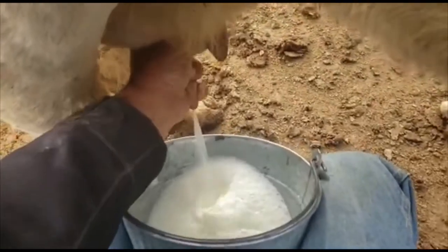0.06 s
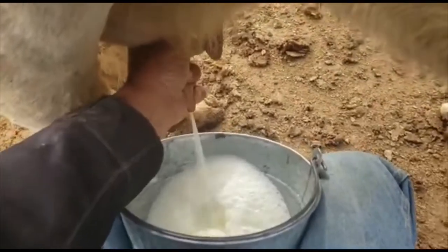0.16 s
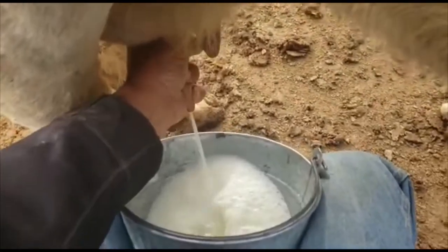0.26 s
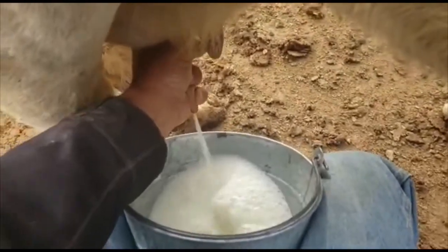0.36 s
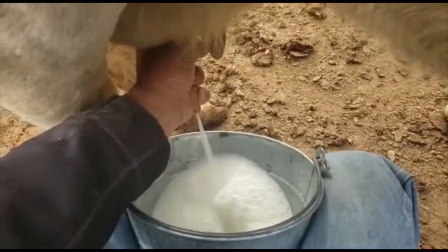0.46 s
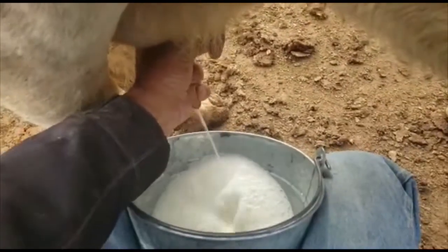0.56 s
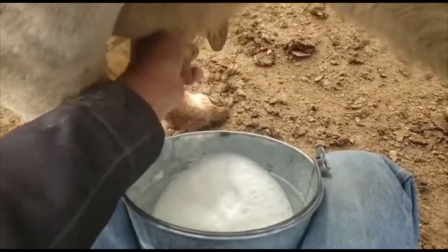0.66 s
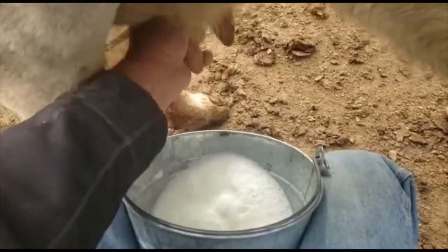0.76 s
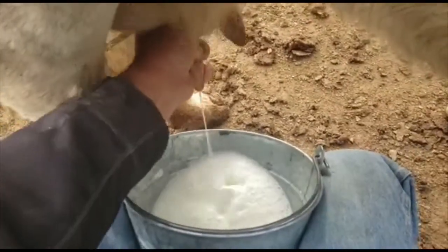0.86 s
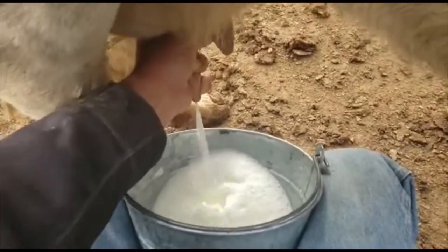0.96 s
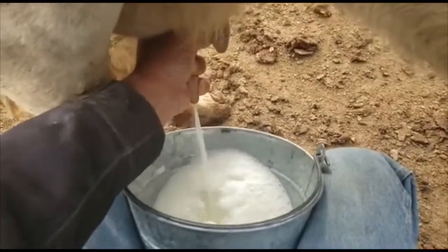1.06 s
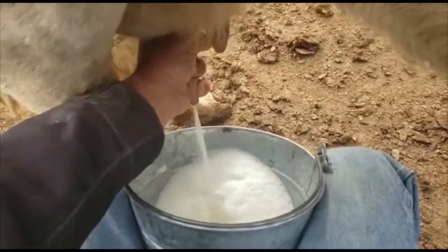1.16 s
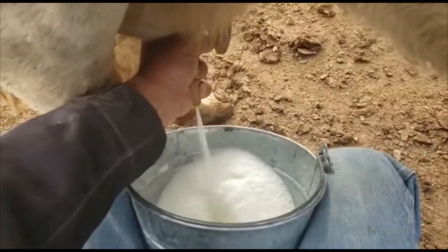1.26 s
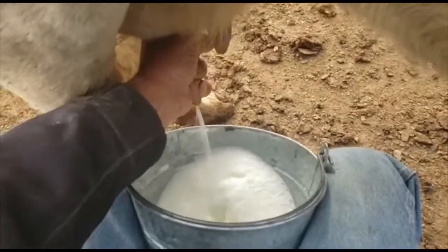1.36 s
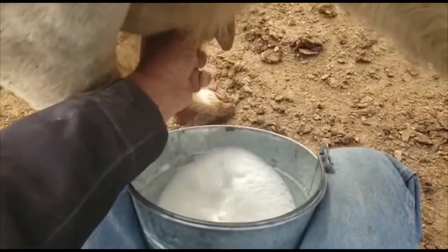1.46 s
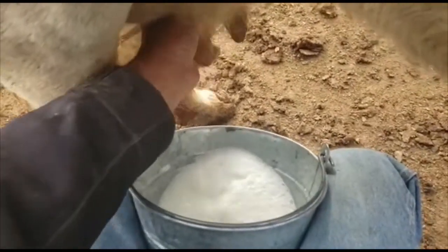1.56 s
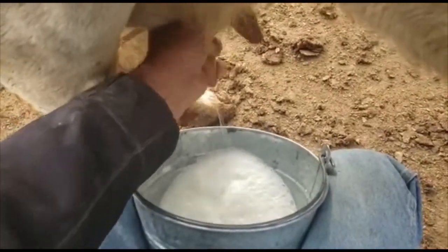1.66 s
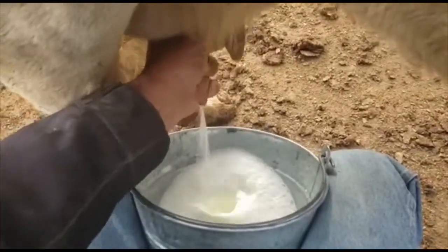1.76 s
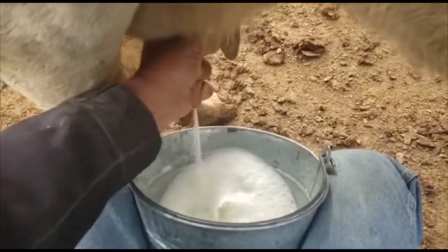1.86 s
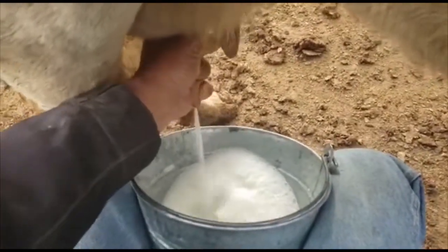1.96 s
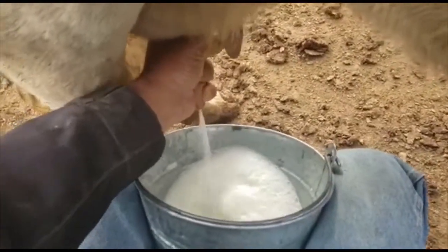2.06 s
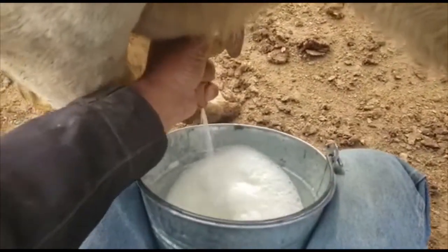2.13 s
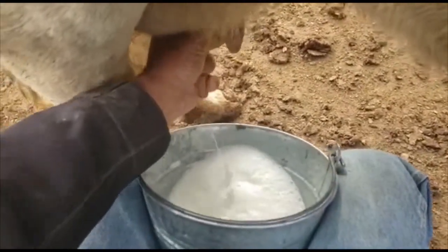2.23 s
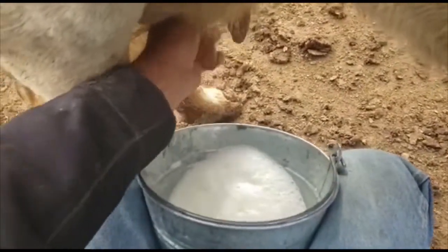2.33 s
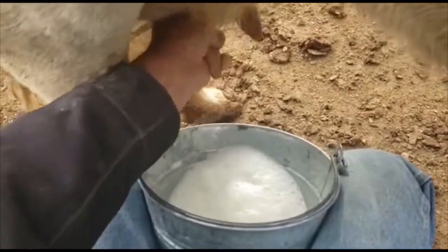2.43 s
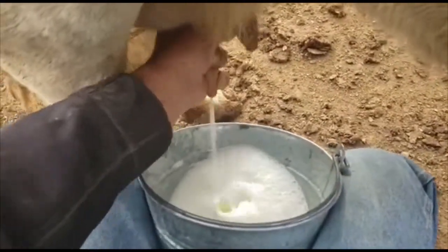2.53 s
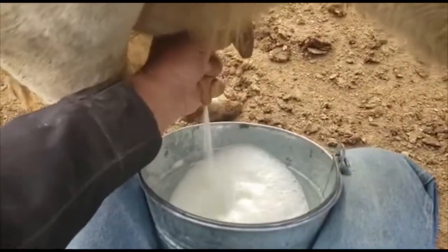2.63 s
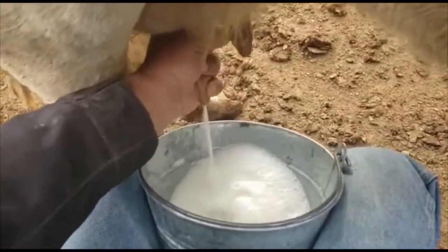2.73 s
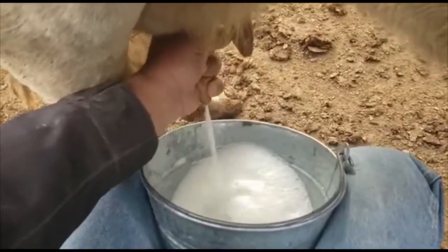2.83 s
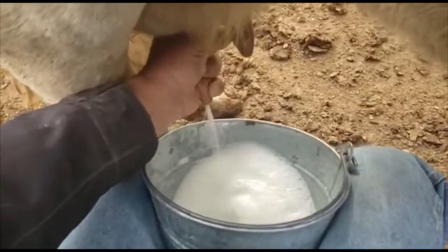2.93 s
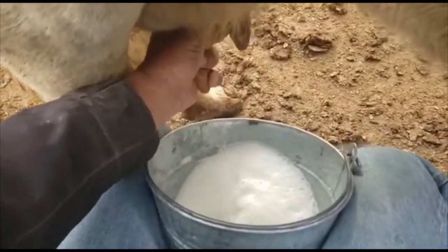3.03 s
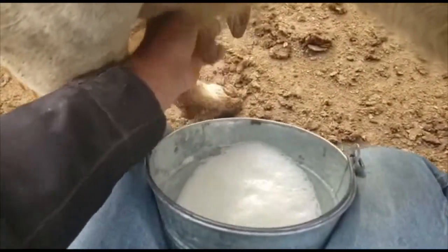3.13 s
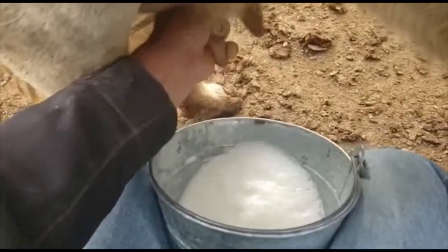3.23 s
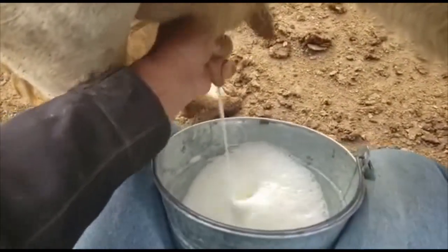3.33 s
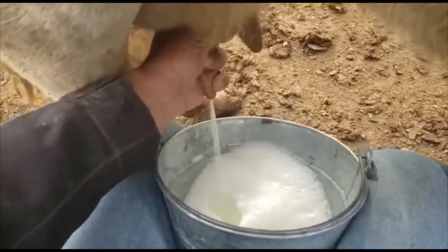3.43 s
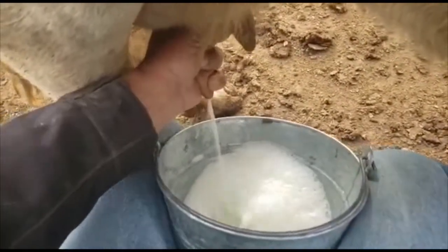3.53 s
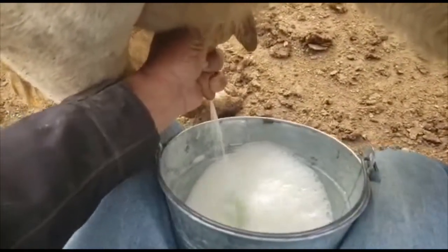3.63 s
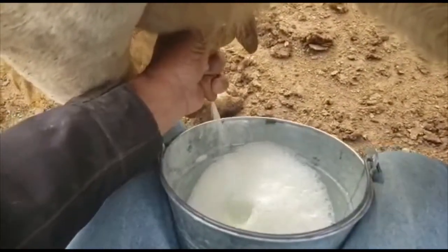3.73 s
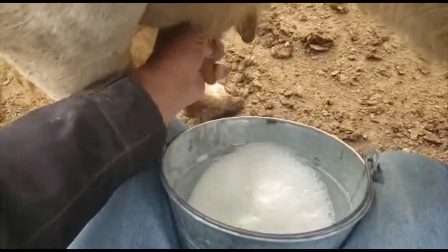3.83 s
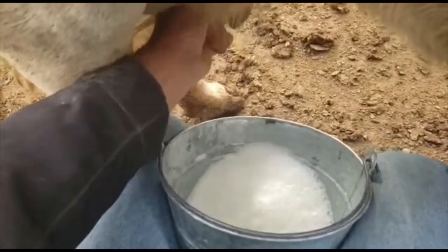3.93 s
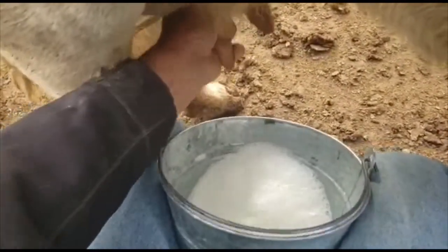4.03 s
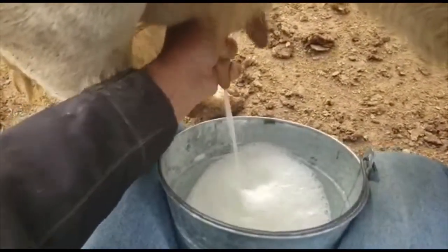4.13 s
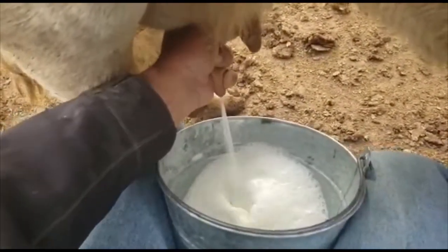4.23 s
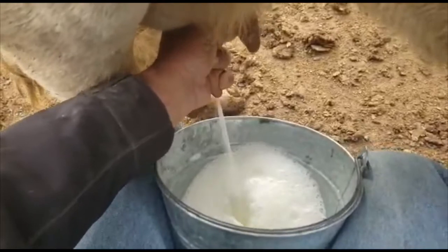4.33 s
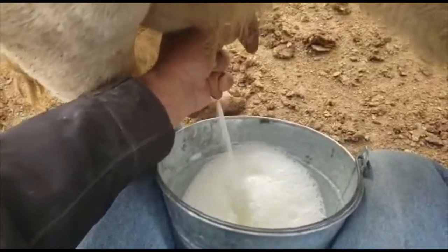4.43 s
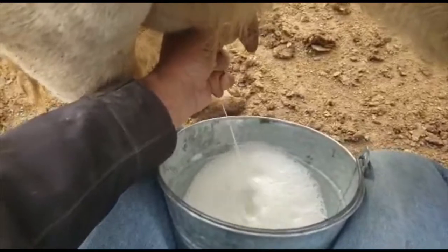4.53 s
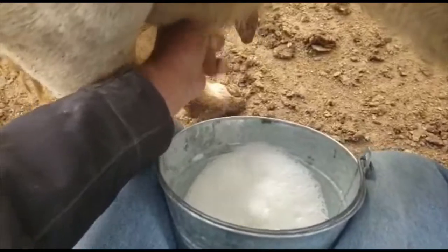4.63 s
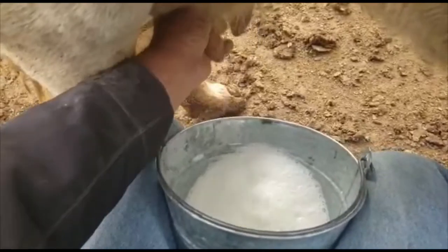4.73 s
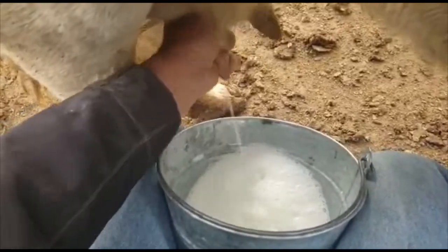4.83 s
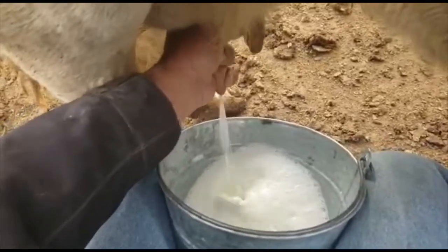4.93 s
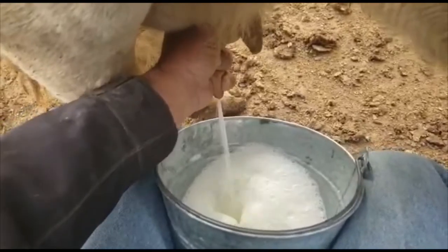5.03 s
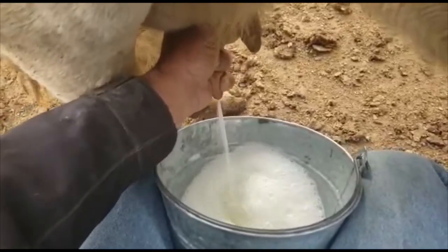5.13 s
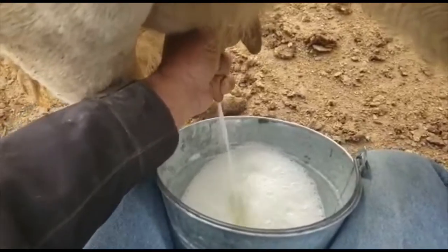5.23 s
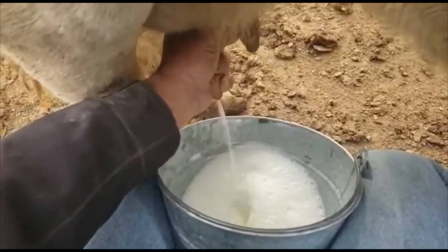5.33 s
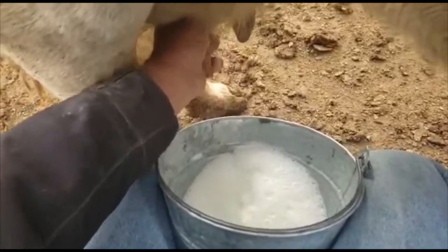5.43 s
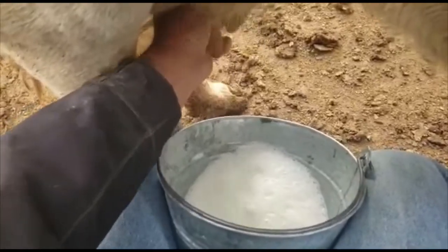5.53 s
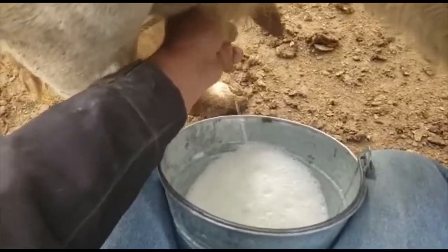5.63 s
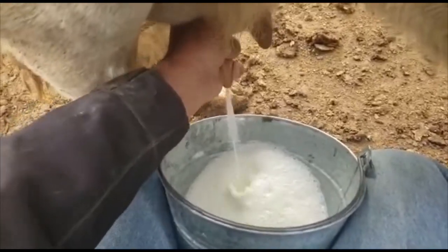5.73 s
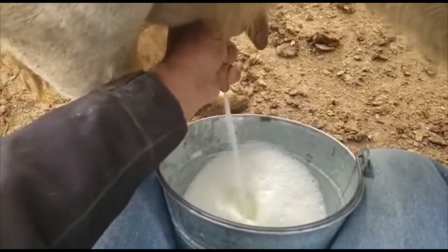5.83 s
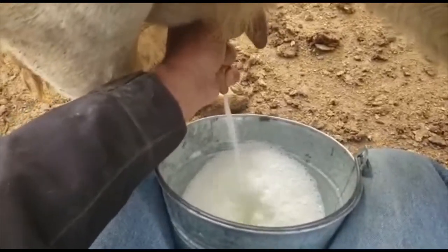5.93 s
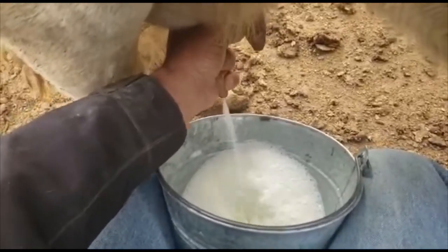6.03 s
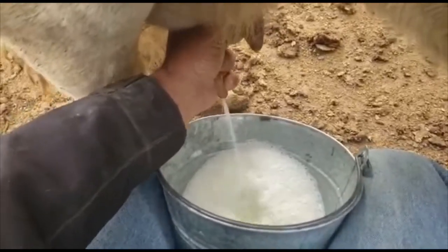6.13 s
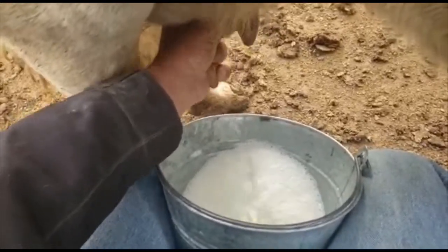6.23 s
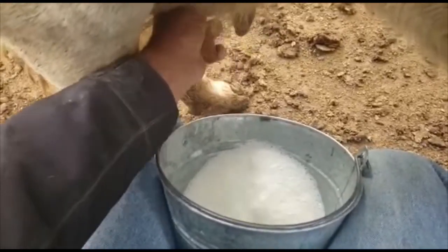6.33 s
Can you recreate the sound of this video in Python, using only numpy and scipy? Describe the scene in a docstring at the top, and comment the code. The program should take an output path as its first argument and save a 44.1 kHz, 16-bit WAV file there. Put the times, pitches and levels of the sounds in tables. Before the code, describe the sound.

Close by, hand-squeezed jets of milk spurt into a foamy metal pail, about one every 0.8 seconds. Each starts suddenly with a hiss, digs into the foam with plops and a low gurgle, then breaks into drops and stops. Sharp little spits and soft fizz fill the gaps. Far off outdoors a vehicle revs up, changes gear and drives on; a cow lows once, very faintly. Close stereo microphones, dry open air.

```python
"""Hand milking into a foaming pail

Jets of milk, squeezed out by hand, spurt into the foam in a metal pail close to a pair of microphones.
Spray, spits and splash are coloured noise puffs; the gurgle of the hole in the foam is decaying sine bubbles.
The foam fizzes as dense tiny puffs, plainest in the pauses. Far off a vehicle speeds up and changes gear
(multiples of its firing rate over rumble), and a cow lows once (harmonics in step). Low noise is moving air."""
import sys
import numpy as np
from scipy import signal
from scipy.fft import rfft, irfft, next_fast_len
from scipy.io import wavfile
from scipy.ndimage import uniform_filter1d

SR = 44100
rng = np.random.default_rng(int(sys.argv[2]) if len(sys.argv) > 2 else 0)


def wrap_up_sound(samples):
    """Save the sound to the file named by the first command line argument, as 16-bit audio."""
    columns = np.atleast_2d(samples).T
    # keep every value between -1 and 1, then stretch to whole-number steps
    tamed = np.clip(columns, -1, 1)
    steps = np.round(tamed * 32767).astype(np.int16)
    wavfile.write(sys.argv[1], SR, steps)


def field_ratio(decibels):
    """Amplitude ratio for a level in dB (20 dB per decade); scalars and array-likes work."""
    return 10 ** (np.asarray(decibels, dtype=float) / 20)


N = 281342

# Squirts. Each row: jet start, full flow, grip easing, knee and stop in seconds, spray level in dB at full flow
# before the surge. Squirts 2, 5, 6 and 8 break off abruptly; the others fade.
SQUIRTS = [(-.05, .0, 0.42, .586, 0.61, -34.5), (0.825, 0.875, 1.33, 1.436, 1.41, -34.5),
           (1.663, 1.708, 2.06, 2.2, 2.238, -34.5), (2.463, 2.518, 2.833, 2.974, 3.085, -36),
           (3.273, 3.329, 3.58, 3.79, 3.792, -35.5), (4.078, 4.123, 4.47, 4.54, 4.53, -37),
           (4.803, 4.856, 5.22, 5.36, 5.385, -36), (5.623, 5.685, 6.02, 6.24, 6.197, -36.5)]
# Spits of milk, ticks and bursts, before colouring. Each row: time in seconds, hiss peak in dB,
# centre in Hz, length in seconds, thud in dB re the hiss.
SPITS = [(.021, -20.5, 3800, 0.019, 5), (.2569, -28, 5540, .003, -25), (.282, -18, 5800, 0.0047, -22),
         (0.876, -14, 3720, 0.0021, 3), (0.906, -11.5, 3760, 0.0024, -15), (1.4263, -36, 7000, 0.0036, -20),
         (1.7377, -14.5, 3400, 0.0029, -12), (1.744, -14.5, 3400, 0.0038, -19),
         (1.7475, -24, 6473, 0.0037, -16), (2.699, -26, 6110, 0.0023, -26),
         (2.9006, -26, 5600, 0.0025, -12), (3.003, -47, 6000, .002, -20), (3.034, -44, 5056, .006, 4),
         (3.338, -31, 3000, .0035, 9), (3.7714, -38, 5460, 0.0038, -20), (3.82, -28, 5240, 0.021, -5),
         (4.0377, -3, 5583, 0.0071, -25), (4.043, -12, 5607, 0.023, -22), (4.1143, -12.5, 6080, .005, -12),
         (4.121, -21.5, 5000, 0.014, -18), (4.233, -16, 5750, .0015, -24), (4.658, -28, 5520, 0.013, -5),
         (4.833, -29, 5540, .0045, 1), (4.859, -14, 5817, 0.0053, -20), (5.462, -24, 5800, 0.022, -8),
         (5.5787, -30.5, 5796, 0.011, -4), (5.648, -27, 5530, .0035, -18), (5.698, -16.5, 5286, 0.0094, -9),
         (6.082, -22.5, 5900, .0043, -31), (6.2997, -40.5, 5406, 0.0096, -9)]
# Spit opening each squirt but the first: hiss peak in dB, centre in Hz, length in seconds
# (below the 1 ms floor, so 1 ms), thud in dB re the hiss.
OPENING_SPIT = (-30, 5500, -0.1, -23)
# Single loud bubbles: low gulps, and higher plops at the mouth of the hole.
# Each row: time in seconds, level in dB before colouring, pitch in Hz.
LOUD_BUBBLES = [(.019, -19.5, 980), (.029, -15.5, 299), (0.151, -27, 330), (0.217, -21, 305),
                (.309, -21, 320), (.844, -28.5, 421), (0.873, -19.5, 1180), (.875, -24.5, 275.2),
                (.952, -24, 326), (1.107, -19, 273), (1.73, -24, 1001), (1.737, -21, 1110),
                (1.747, -20.5, 410), (1.836, -26, 339), (2.018, -20.5, 323), (2.123, -22.5, 335),
                (2.504, -26.5, 469.7), (2.523, -25.5, 985), (3.294, -27, 428), (3.336, -23, 1170),
                (3.337, -19.5, 415), (3.561, -25, 368), (3.593, -22, 326), (3.82, -32.5, 260),
                (4.04, -20.5, 293.2), (4.082, -19, 1160), (4.1, -30, 1170), (4.172, -30, 1170),
                (4.196, -27, 1160), (4.3, -23.5, 357), (4.847, -23.5, 1200), (4.883, -30, 958),
                (4.885, -21, 450), (4.965, -30, 301), (5.064, -27, 410.6), (5.2, -25, 300),
                (5.465, -34, 291.7), (5.664, -27.5, 450), (5.68, -24, 1249), (5.829, -20, 328),
                (5.972, -22.5, 297)]
# Spray colour. Each row: frequency in Hz, relative density in dB per Hz.
SPRAY_COLOUR = [(1400, -20.5), (2000, -14.5), (2450, -8.5), (3200, -2.5), (3700, -4.5), (4400, -3.5),
                (5300, 1.5), (6300, -2), (7500, -1), (8200, -6.5), (9000, -10.5), (10500, -5.5),
                (12100, -3), (14000, 0), (15600, -3)]
# Splash colour at the mouth of the hole. Each row: frequency in Hz, relative density in dB per Hz.
HOLE_MOUTH_COLOUR = [(410, -47), (700, -3), (974, 4.5), (1060, 2.5), (1190, 2), (1350, -8.5), (1640, 3.5),
                     (2020, -6), (2400, -13.5), (3120, -31), (5280, -120)]
# Pail resonances. Each row: frequency in Hz, width in Hz, lift in dB.
PAIL_RINGS = [(3400, 110, 3), (4013, 210, 5.5), (4760, 62, 7.5), (5160, 64, -7.5), (5657, 170, 5),
              (6450, 45, 4.5), (7350, 51, 9), (12000, 47, 9.5)]
# Fizz colour. Each row: frequency in Hz, relative density in dB per Hz.
FIZZ_COLOUR = [(240, -29.5), (400, -3), (439, -13), (697, -20.5), (1600, -26), (1900, -23), (2290, -29),
               (2800, -23), (3310, -26), (4310, -20.5), (6950, -18.5), (8630, -27), (16000, -23.5)]
# Fizz level before stirring and wander. Each row: time in seconds, level in dB.
FIZZ_LEVEL = [(.7, -63.5), (1.45, -56), (1.65, -60.5), (2.35, -61), (3.05, -55), (3.26, -64.5), (3.8, -53),
              (4, -55), (4.6, -66), (4.8, -71), (5.42, -61.5), (5.6, -73), (6.25, -65), (6.36, -61)]
# Engine. Each row: time in seconds, firing rate in Hz, levels in dB of its multiples 2, 3 and 4 before blur.
ENGINE = [(0, 33.15, -38, -40, -32), (.17, 35.46, -43, -39, -43.5), (.3, 37.15, -39, -35, -36),
          (.45, 38.74, -41, -52, -42), (.6, 41.2, -36.5, -36, -37), (.76, 43, -45, -40, -47),
          (1.05, 47, -35.5, -33.5, -45.5), (1.3, 52, -43, -38.5, -59), (1.55, 54.6, -41, -35, -56),
          (1.95, 60.4, -41, -46.5, -68), (2.06, 62.03, -54, -39.5, -77), (2.3, 65.8, -35, -50, -52),
          (2.52, 67.96, -50.5, -47, -57), (2.7, 71.2, -35, -38.5, -60), (3.02, 74.3, -40.5, -42.5, -73),
          (3.12, 69.6, -49, -46, -64), (3.36, 58.2, -53, -51, -62), (3.47, 52.46, -55, -45, -62),
          (3.6, 51.43, -54, -46, -56), (3.72, 49.7, -57, -39, -65), (3.83, 43.9, -52, -42.5, -60),
          (3.89, 36.3, -50, -48, -40), (4.01, 36.9, -52, -46, -37), (4.12, 42.23, -44.5, -49.5, -52),
          (4.45, 41.24, -46.5, -46, -51.5), (5, 43.46, -47.5, -48.5, -54), (5.6, 45.9, -46, -45.5, -61),
          (6.38, 50.3, -51, -43, -70)]
# Share of each tone broken up by the air on the way. Each row: time in seconds, share from 0 to 1.
AIR_BLUR = [(0, .12), (3.05, .15), (3.3, .75), (6.38, .75)]
# Road rumble colour. Each row: frequency in Hz, relative density in dB per Hz.
RUMBLE_COLOUR = [(25, -35), (45, -12), (90, -4), (150, 3.5), (220, -5), (300, -14.5), (420, -34),
                 (600, -44.5)]
# Road rumble level before wander. Each row: time in seconds, level in dB.
RUMBLE_LEVEL = [(0, -38.5), (1, -42), (2, -42), (3, -47), (4, -46), (5, -51), (6.38, -47.5)]
# Cow. Each row: time in seconds, pitch in Hz, level in dB before the muzzle.
MOO = [(1.24, 77.3, -70), (1.32, 80.2, -61), (1.45, 83.2, -58.5), (1.55, 86.13, -57), (1.8, 86.2, -59),
       (1.92, 84.7, -61), (2.02, 84.1, -68)]
# Half-shut muzzle. Each row: frequency in Hz, gain in dB.
MUZZLE = [(340, 1), (430, -4), (520, 0.5), (690, 0), (800, -1), (900, -14.5), (1100, -8.5), (1300, -33)]
# Phase between ports. Each row: frequency in Hz, lead of the left port in radians.
LEFT_LEAD = [(0, 0), (1120, 0.43), (1720, 1.37), (3270, 1.16), (4310, 1.68), (4650, -1.8), (5080, 0),
             (5770, 4.5), (7320, 7), (9040, 10), (10200, 10.5), (12100, 4.5), (14200, 9), (16400, 49)]
# Balance between ports. Each row: frequency in Hz, left minus right in dB.
LEFT_LEAN = [(60, 9), (110, 1), (200, 2.5), (380, 2.5), (700, 3.5), (1290, -3), (2380, 4), (4400, -8.5),
             (8120, -2.5), (15000, 0.5)]
# Likeness of the ports. Each row: frequency in Hz, shared part from 0 to 1.
PORT_LIKENESS = [(60, .93), (180, .99), (400, .99), (700, .94), (1400, .84), (2800, .64), (6000, .64),
                 (10000, .4), (15000, .3)]
# Loud bubble colour. Each row: frequency in Hz, relative gain in dB.
LOUD_BUBBLE_COLOUR = [(100, -30), (200, -2), (20000, -0.5)]
# Centres in Hz of the four bands coloured by where the jet lands.
AIM_HZ = [2320, 3380, 7600, 11400]
# Where the jet lands. Each row: time in seconds, lifts in dB of the four AIM_HZ bands, left minus right in dB.
AIM = [(.3, 11, 2, 2.5, 2, 0.43), (1.1, 1, 2.5, -3, -3, 0.88), (1.9, 5.5, -1, -1, -.5, 0.47),
       (2.7, 10, 0, 1.6, 2.5, 1), (3.5, 10.5, 2, 2.5, 2, 0.074), (4.3, 7, 2, -2, -1, -1.1),
       (5.1, 9.5, -0.5, 3, 0.5, -1.38), (5.9, 6, 2, 4.5, 3.5, -2.2)]
# Bubble crowd colour, from the hole. Each row: frequency in Hz, relative gain in dB.
HOLE_COLOUR = [(120, -23.5), (230, -6), (320, -0.5), (450, -3), (600, -5.5), (800, -3.5), (20000, -13.5)]
# Spit colour. Each row: frequency in Hz, relative gain in dB.
SPATTER_COLOUR = [(150, -29.5), (300, 10), (2000, -6.5), (2500, -4.5), (3200, -1), (7600, 3), (9000, -9),
                  (12000, 3.5), (16500, 4.5)]
# Moving air, before wander and port offsets. Each row: time in seconds, level in dB.
GUST = [(0, -56), (.3, -42), (.37, -30), (.44, -55), (2, -65), (6.38, -86)]
# Layer gains over a squirt: dB re the spray gain in the first drops, at full flow, late in the hold,
# in the release; then settling time after full flow in seconds. Later layer gains come on top.
GURGLE_LAYER = (-2.5, -1, -4, 2, 0.35)
SPLASH_LAYER = (-17.5, -8.5, -17, -13, 0.08)
# Fat separate drops, stronger re the spray in the first drops and the release than at full flow;
# negative time: full-flow offset grows.
BREAKUP_LAYER = (-7.5, -14.5, -13, -7.5, -3)
# Digging depth of the jet. Each row: time in seconds, gurgle lift in dB, splash lift in dB.
DEPTH = [(.1, 3, 2), (.45, -0.5, 1), (1.1, 1, 0), (1.9, -1, 0), (2.7, 0, 1), (3.5, 1, 2), (4.15, 0.5, 2.5),
         (4.4, 0.5, -0.5), (5.1, 0, 0.5), (5.9, -1.5, -0.5)]


def evened(x):
    """Scales to rms 1."""
    return x / np.sqrt(np.mean(x ** 2) + 1e-20)


def read(points, hz):
    """Reads a spectrum on a log-frequency axis."""
    f, value = np.transpose(points)
    return np.interp(np.log(hz + 1), np.log(f + 1), value)


def curve(rows, column=1):
    """One column of a table at every sample."""
    rows = np.array(rows)
    return np.interp(np.arange(N) / SR, rows[:, 0], rows[:, column])


def wander(hz):
    """Low-passed noise of rms 1: slow chance."""
    return evened(signal.lfilter([1], [1, -np.exp(-2 * np.pi * hz / SR)], rng.standard_normal(N)))


def band(x, hz, q):
    """A two-pole resonance of gain 1."""
    return signal.lfilter(*signal.iirpeak(hz, q, SR), x)


def heard(pair, colour, rings=()):
    """Minimum-phase colour, then two ports: the right mixes a phase-shifted pair[0] with pair[1]."""
    size = next_fast_len(N + 4096)
    hz = np.fft.rfftfreq(size, 1 / SR)
    gain_db = np.maximum(read(colour, hz), -80)
    gain_db += sum(lift / (1 + (2 * (hz - f) / width) ** 2) for f, width, lift in rings)
    # folding the cepstrum makes the filter causal
    cepstrum = irfft(gain_db * np.log(10) / 20, size)
    cepstrum[1:size // 2] *= 2
    cepstrum[size // 2 + 1:] = 0
    gain = np.exp(rfft(cepstrum))
    shared, other = rfft(pair, size)
    same = np.clip(read(PORT_LIKENESS, hz), 0, 1)
    lag = np.exp(-1j * np.interp(hz, *np.transpose(LEFT_LEAD)))
    right = same * shared * lag + np.sqrt(1 - same ** 2) * other
    lean = field_ratio(read(LEFT_LEAN, hz) / 2)
    ports = irfft(np.array([shared * lean, right / lean]) * gain, size)[:, :N]
    return ports / np.sqrt(np.mean(abs(gain) ** 2))


def patchy(sound, patch_db, lift_db=0):
    """Colour that shifts in random patches of time and pitch, plus a given lift."""
    hz, t, z = signal.stft(sound, SR, nperseg=256, noverlap=192)
    patches = uniform_filter1d(rng.standard_normal((len(t), len(hz))), size=30, axis=0)
    patches = evened(uniform_filter1d(patches, size=4, axis=1)).T
    z = z * field_ratio(patch_db * patches + lift_db)
    return signal.istft(z, SR, nperseg=256, noverlap=192)[1][:, :N]


def droplets(per_s, spread_db, decay_ms):
    """Noise broken into short puffs of unequal size, rms 1, in two unrelated copies."""
    size = field_ratio(spread_db * np.minimum(rng.exponential(1, N), 5))
    size = size * (rng.random(N) < per_s / SR)
    power = signal.lfilter([1], [1, -np.exp(-1000 / (decay_ms * SR))], size ** 2)
    return evened(np.sqrt(power) * rng.standard_normal((2, N)))


def squirt_gain(layer=None):
    """Gain of the spray, or of a layer given re it: first drops, surge, hold, release, silence."""
    dribble_db, surge_db, surge_s = -14, 0.5, 0.028
    knee_db, stop_db = -13.5, -41.5  # reached at the knee and stop times
    dig_s = 0.029  # time at full flow to break through the foam
    out, t = np.zeros(N), np.arange(N) / SR
    for start, full, ease, knee, stop, spray_db in SQUIRTS:
        since = np.maximum(t - full, 0)
        opening = np.interp(t, [start, full], [0, 1])
        # the squirt falls silent after its stop time
        shape_db = np.interp(t, [start, full, ease, knee, stop], [dribble_db, 0, 0, knee_db, stop_db], -200, -200)
        shape_db += surge_db * opening * np.exp(-since / surge_s)
        if layer:
            first_db, full_db, late_db, end_db, settle_s = layer
            shape_db += np.interp(t, [start, full, ease, knee], [first_db, late_db, late_db, end_db])
            broken_in = np.interp(t, [start, full + dig_s], [0, 1])
            settling = np.exp(-np.maximum(since - dig_s, 0) / settle_s)
            shape_db += (full_db - late_db) * broken_in * settling
        out += field_ratio(spray_db + shape_db)
    return out


def spray():
    """Fine drops spatter on foam and metal; the colour shifts as the jet wanders."""
    flutter = field_ratio(0.46 * wander(32) + 1.17 * wander(6.1))  # the jet wobbles
    hiss = droplets(2600, 1.6, decay_ms=.7)
    crackle = droplets(45, 2.5, decay_ms=.25)
    fat = droplets(110, 2.8, decay_ms=1.2) * squirt_gain(BREAKUP_LAYER)
    jet = (hiss + .16 * crackle) * squirt_gain() * flutter
    sound = heard(jet + fat, SPRAY_COLOUR, PAIL_RINGS)
    # same time-frequency grid as patchy()
    hz = np.fft.rfftfreq(256, 1 / SR)[:, None]
    t = np.arange(-(-N // 64) + 1) * 64 / SR
    s, *lifts, _ = np.transpose(AIM)
    lift_db = sum(np.exp(-((hz - f) / (0.07 * f)) ** 2) * np.interp(t, s, db) for f, db in zip(AIM_HZ, lifts))
    return patchy(sound, 2.37, lift_db) * field_ratio(curve(AIM, column=5) * [[.5], [-.5]])


def spits():
    """Noise bursts that start at once, hold and die fast, each with a duller thud."""
    out, t = np.zeros((2, N + SR)), np.arange(SR // 10) / SR
    rows = [(row[0], *OPENING_SPIT) for row in SQUIRTS[1:]] + SPITS
    noises = rng.standard_normal((len(rows), 2, 2, len(t)))
    for (s, peak_db, hz, length_s, thud_db), noise in zip(rows, noises):
        hold = np.exp(-(t / np.clip(length_s, .001, .05)) ** 1.95)
        shape = np.minimum(t / 0.00042, 1) * hold * (1 + 0.37 * np.exp(-t / 0.00063))
        hiss = shape * (band(noise[0], hz, q=2.85) + 0.15 * noise[0])
        thud = shape * (band(noise[1], 1380, q=1.0) + 1.66 * band(noise[1], 356, q=1.06))
        burst = hiss / abs(hiss[0]).max() + field_ratio(thud_db) * thud / abs(thud[0]).max()
        out[:, round(s * SR):][:, :len(t)] += field_ratio(peak_db) * burst
    return heard(out[:, :N], SPATTER_COLOUR, PAIL_RINGS)


def splash():
    """Coarser drops splash at the mouth of the hole in the foam."""
    drops = droplets(700, 2.5, decay_ms=3.0) * squirt_gain(SPLASH_LAYER)
    return heard(drops * field_ratio(curve(DEPTH, column=2) + 1.97 * wander(9.8)), HOLE_MOUTH_COLOUR)


def bubble(hz, cycles, rise):
    """A pocket of air: a quick start, a few cycles, pitch climbing as it shrinks."""
    u = np.arange(int(SR * .08)) / SR * hz  # time in cycles
    return np.minimum(u / 0.76, 1) * np.exp(-u / cycles) * np.sin(2 * np.pi * u * (1 + rise * u))


def gurgle():
    """Air dragged down by the jet: a crowd of low bubbles, and single loud ones, low gulps and higher plops."""
    crowd = np.zeros(N)
    crowd_chance = rng.random((16, 2))
    for k, chance in enumerate(crowd_chance):
        hz = 245 * 2.38 ** (k / len(crowd_chance))
        size = field_ratio(2.6 * np.minimum(rng.exponential(1, N), 4))
        size = size * (rng.random(N) < 70 / SR) * rng.choice([-1, 1], N)  # 70 per second at each pitch
        crowd += signal.oaconvolve(size, bubble(hz, 1.6 + 2 * chance[0], 0.023 * chance[1]))[:N]
    crowd = evened(crowd) * squirt_gain(GURGLE_LAYER) * field_ratio(curve(DEPTH) + 1.7 * wander(9.7))
    singles = np.zeros(N + SR)
    for s, db, hz in LOUD_BUBBLES:
        sound = bubble(hz, 2.33, 0.0034)
        singles[round(s * SR):][:len(sound)] += field_ratio(db) * sound

    def pair(x):
        """A later copy stands for what only one port hears."""
        return np.array([x[:N], np.roll(x[:N], 400)])

    return field_ratio(-9.5) * heard(pair(crowd), HOLE_COLOUR) + heard(pair(singles), LOUD_BUBBLE_COLOUR)


def foam():
    """Countless tiny bubbles bursting; each long spit stirs them up for a moment."""
    stir_db, stir_s, long_s = -28, 0.064, .007  # dB re the spit's peak, decay, shortest spit that stirs
    t, stirred = np.arange(N) / SR, np.zeros(N)
    for s, peak_db, _, length_s, _ in SPITS:
        if length_s > long_s:
            stirred += (t > s) * field_ratio(peak_db + stir_db) * np.exp(-abs(t - s) / stir_s)
    level = (field_ratio(curve(FIZZ_LEVEL)) + stirred) * field_ratio(3.2 * wander(2.1))
    return patchy(heard(droplets(3000, 0.95, decay_ms=0.87) * level, FIZZ_COLOUR), 1.3)


def vehicle():
    """Low multiples of the firing rate, wavering with distance, over the rumble of the road."""
    pull_db, coast_db = -64.5, -48  # the firing rate itself
    coast_s = (3.1, 3.2, 3.7, 3.85)  # it swells, then fades
    blur_hz = 8
    t, blur = np.arange(N) / SR, np.clip(curve(AIR_BLUR), 0, 1)
    turns = np.cumsum(curve(ENGINE) * (1 + 0.005368 * wander(4.63))) / SR
    levels_db = [np.interp(t, coast_s, [pull_db, coast_db, coast_db, pull_db])]
    levels_db += [curve(ENGINE, k) for k in range(2, 5)]
    tones = np.zeros(N)
    for multiple, db in enumerate(levels_db, 1):
        in_phase, quadrature = [uniform_filter1d(wander(blur_hz), size=900) for _ in range(2)]
        size = np.sqrt(2 * (1 - blur ** 2)) + blur * (in_phase + 1j * quadrature)
        tones += field_ratio(db) * (size * np.exp(2j * np.pi * multiple * turns)).real
    rumble = rng.standard_normal((2, N)) * field_ratio(curve(RUMBLE_LEVEL) + 0.56 * wander(1.5))
    return np.array([field_ratio(.6) * tones, np.roll(tones, -4)]) + heard(rumble, RUMBLE_COLOUR)


def cow():
    """Steady pulses: a low stack of harmonics in step, through a half-shut muzzle, louder on the left."""
    s, hz, db = np.transpose(MOO)
    t = np.arange(s[0], s[-1], 1 / SR)
    hz = np.interp(t, s, hz)
    drift = wander(10)  # air on the way makes each harmonic waver
    turns = np.cumsum(hz) / SR
    voice = np.zeros(len(t))
    for k in range(4, 16):
        gain = field_ratio(read(MUZZLE, k * hz) + 2.6 * drift[k * 9000:][:len(t)])
        voice += gain * np.cos(2 * np.pi * k * turns)
    out = np.zeros(N)
    out[round(s[0] * SR):][:len(t)] = field_ratio(np.interp(t, s, db)) * voice
    return np.array([field_ratio(0.5) * out, field_ratio(-6.5) * np.roll(out, -5)])


def breeze():
    """Lumpy low pressure of moving air, unrelated at the two ports, mostly on the left."""
    centre_hz, port_db = 52, [[2], [-10]]
    push = band(band(rng.standard_normal((2, N)), centre_hz, q=1), centre_hz, q=1)
    return field_ratio(curve(GUST) + 2 * wander(4.6) + port_db) * evened(push)


def scene():
    """Everything at the two ports."""
    return spray() + spits() + splash() + gurgle() + foam() + vehicle() + cow() + breeze()


def roll_off(x):
    """The treble ends steeply here."""
    return signal.sosfilt(signal.butter(12, 16820, fs=SR, output="sos"), x)


def record(dry):
    """Bass cut and band limit of the finished mix."""
    bass_cut_hz, edge_hz = 38, 15900
    cut = signal.sosfilt(signal.butter(2, bass_cut_hz, "high", fs=SR, output="sos"), dry)
    low_pass = signal.firwin(801, edge_hz, window=("kaiser", 6), fs=SR)
    return roll_off(signal.oaconvolve(cut, low_pass[None], "same"))


dry = scene()
out = record(dry)
wrap_up_sound(out)
```